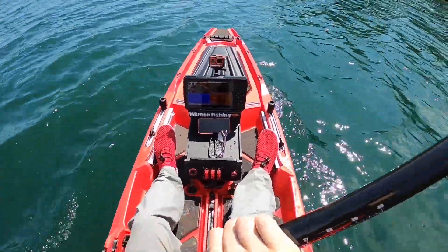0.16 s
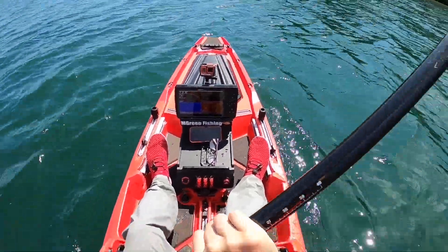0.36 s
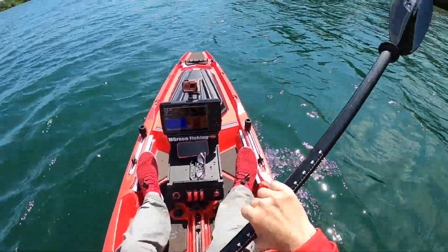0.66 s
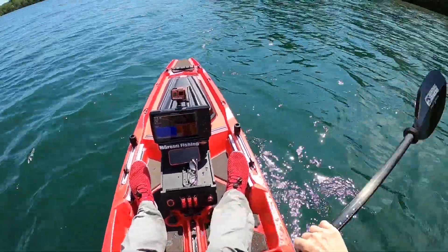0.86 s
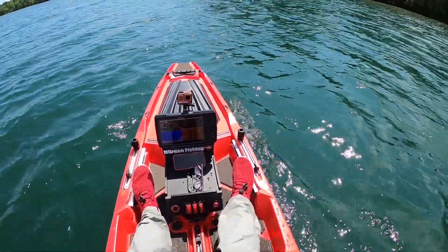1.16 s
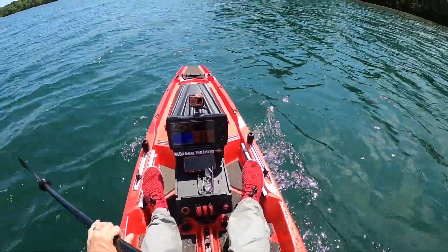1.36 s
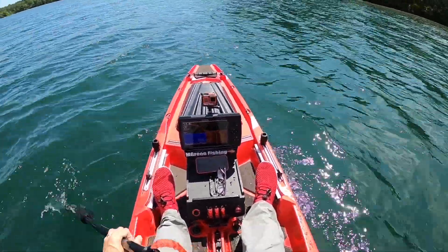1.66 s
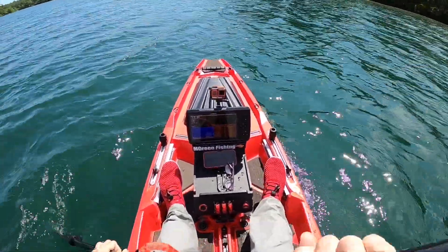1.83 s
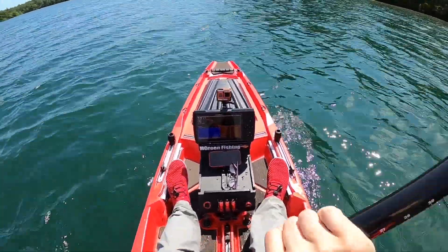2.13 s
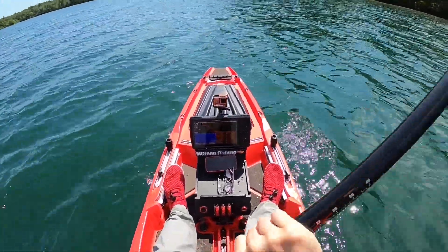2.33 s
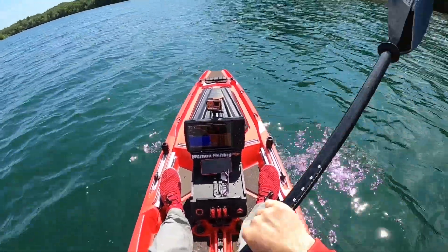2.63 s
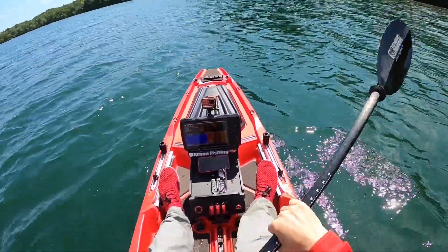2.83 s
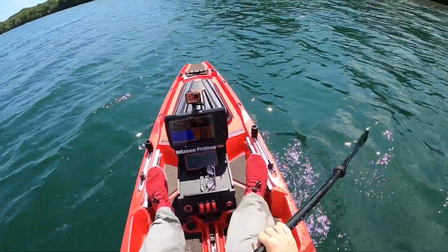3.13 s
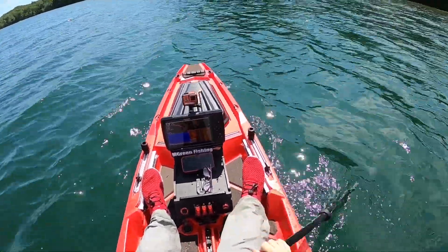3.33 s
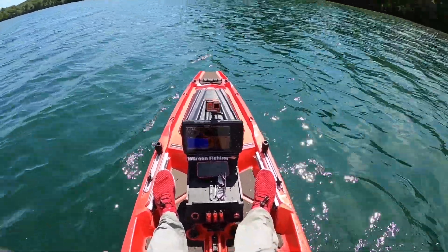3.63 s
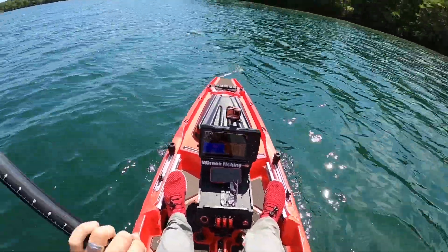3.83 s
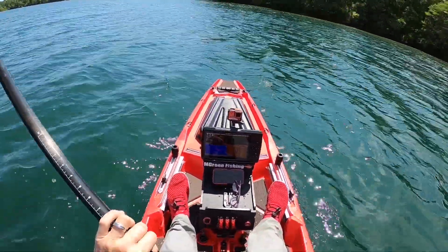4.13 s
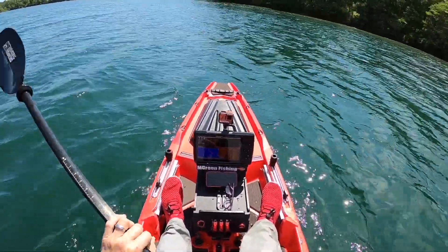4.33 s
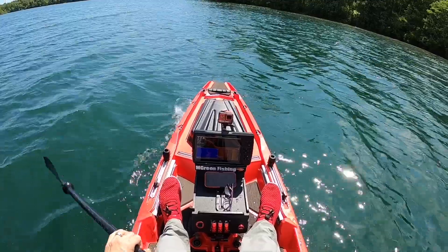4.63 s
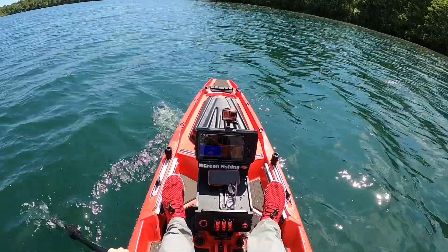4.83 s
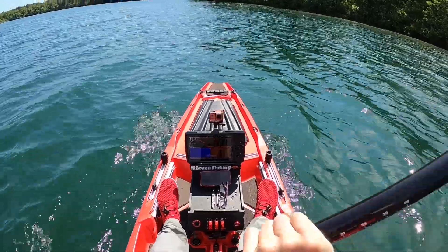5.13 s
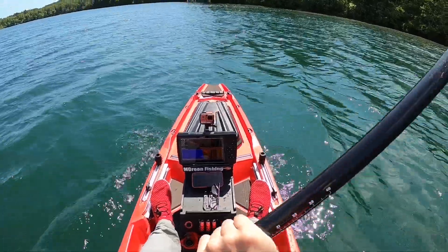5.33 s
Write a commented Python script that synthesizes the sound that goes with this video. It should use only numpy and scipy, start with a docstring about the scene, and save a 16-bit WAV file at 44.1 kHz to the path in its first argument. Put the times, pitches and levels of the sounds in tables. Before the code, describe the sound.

Close, single-channel sound of kayak paddling: soft hissing, bubbly water and bright drips from the blade under low wind buffeting. A faint rising whistle appears early and again near four seconds. Dripping is dense in the middle, a sharp plink comes at 3.3 seconds, wind thumps soon after, and a calmer gap leads to fresh splashing and a final gust.

```python
"""A kayak glides over a lake: filtered noise makes the wind that buffets the microphone on the paddler's head,
and noise with tiny bubble tones makes the water that fizzes along the hull and swells at each stroke.
Drops tick on water and deck from the start, as ringing pings; rising tones make bubbles that plop.
At 0.6 s a thin, faint sine whistles upward; from 1.6 to 2.8 s drops crowd in; near 3.6 s the wind thumps.
The whistle returns at 3.9 s, then from 4.8 s drops and splashes pick up and the wind rumbles louder to the end."""
import sys
import numpy as np
from scipy import signal
from scipy.fft import rfft, irfft, next_fast_len
from scipy.io import wavfile
from scipy.ndimage import uniform_filter1d

SR = 44100
rng = np.random.default_rng(int(sys.argv[2]) if len(sys.argv) > 2 else 0)


def file_out(sig):
    """Save sig as 16-bit WAV at sys.argv[1]."""
    # one column per channel
    cols = np.atleast_2d(sig).T
    # limit, then scale
    lim = np.clip(cols, -1, 1)
    pcm = np.round(lim * 32767).astype(np.int16)
    wavfile.write(sys.argv[1], SR, pcm)


N = 241528  # length in samples, about 5.5 s


def gain_of(db):
    """Turns decibels into a plain multiplier."""
    return 10 ** (np.asarray(db) / 20)


def evened(x):
    """Scales a signal so its average strength (rms) is 1."""
    return x / np.sqrt(np.mean(x ** 2) + 1e-20)


def smoothed(x, *widths):
    """Runs one moving average after another along the samples."""
    for width in widths:
        x = uniform_filter1d(x, width)
    return x


def read(points, hz):
    """Reads a level curve at any pitch, with pitch spaced by ratio as we hear it."""
    point_hz, level_db = np.transpose(points)
    return np.interp(np.log(hz + 1), np.log(point_hz + 1), level_db)


def curves(rows):
    """Joins each table column into a curve with one value per sample."""
    start_s, *columns = np.transpose(rows)
    return [np.interp(np.arange(N) / SR, start_s, column) for column in columns]


def add(mix, start_s, sound):
    """Adds a sound into the mix at its start time."""
    part = mix[max(round(start_s * SR), 0):][:len(sound)]
    part += sound[:len(part)]


def colour(x, points):
    """Shapes a sound's balance of low and high pitches, then sets its rms to 1."""
    size = next_fast_len(len(x))
    level_db = read(points, np.fft.rfftfreq(size, 1 / SR))
    shaped = irfft(rfft(x, size) * gain_of(level_db), size)
    return evened(shaped[:len(x)])


def band(x, lo_hz, hi_hz):
    """Keeps mainly the pitches between two limits."""
    return signal.sosfilt(signal.butter(3, [lo_hz, hi_hz], "band", fs=SR, output="sos"), x)


def chance(rate_hz):
    """Makes a random curve that wanders no faster than about rate_hz, with rms 1."""
    low_pass = signal.butter(2, rate_hz, fs=SR, output="sos")
    return evened(signal.sosfilt(low_pass, rng.standard_normal(N)))


def bursts(rows, edge_s, close_s, sag_db):
    """Makes a loudness curve that opens quickly at each row, drifts by sag_db and closes."""
    out = np.zeros(N)
    for start_s, level_db, length_s in rows:
        t = np.arange(0, abs(length_s) + edge_s + close_s / 2, 1 / SR)
        end_s = t[-1]
        gate = np.clip(np.minimum(t / edge_s, (end_s - t) / close_s), 0, 1)
        add(out, start_s, gain_of(level_db - sag_db * t / end_s) * gate)
    return out


# How strong each pitch is in the wind's deep rumble: pitch_hz [Hz], level_db [dB per Hz]
RUMBLE_COLOUR = [(12, -8), (25, -1.5), (60, 0), (130, -2), (240, -10.5), (400, -23.5), (800, -42.5),
                 (2000, -104)]
# How strong each pitch is in the wind's faster flutter: pitch_hz [Hz], level_db [dB per Hz]
FLUTTER_COLOUR = [(90, -10), (190, 4.5), (400, -2), (600, -10), (1000, -25), (1800, -75.5), (4000, -86)]
# Sudden puffs straight into the microphone, before overload:
# start_s [s], level_db [dB rms at the start], length_s [s]
PUFF_ROWS = [(.245, -41, .012), (.303, -35, 0.017), (.515, -27.5, 0.023), (.744, -26, 0.013),
             (.863, -29, 0.037), (.906, -28, 0.016), (2.474, -28, 0.014), (2.681, -27, 0.025),
             (2.942, -31, 0.014), (3.081, -42, 0.0096), (3.177, -15, 0.0053), (3.583, -21, 0.027),
             (3.612, -13, 0.0081), (3.672, -41, 0.015), (3.705, -31, 0.016), (5.362, -24.5, 0.015)]
# Wind on the microphone, before overload: start_s [s], rumble_db [dB], flutter_db [dB]
WIND_CURVE = [(0.0, -28, -31), (0.15, -20, -31), (0.21, -26, -41.5), (0.29, -22.5, -25.5),
              (0.69, -25.5, -34), (0.96, -23.5, -26), (1.4, -23.5, -34.5), (1.45, -22.5, -33),
              (1.91, -32, -40), (2.04, -26, -38), (2.12, -32.5, -38.5), (2.71, -23, -25.5),
              (2.97, -23, -31), (3.29, -20.5, -25.5), (3.45, -20, -27.5), (3.57, -15, -26.5),
              (3.6, -17, -24.5), (3.69, -17, -26), (3.74, -16, -31), (3.77, -20.5, -40.5),
              (4.44, -31.5, -54), (4.53, -26.5, -46), (4.62, -31, -34.5), (4.68, -26, -49),
              (4.77, -22, -34.5), (4.96, -30, -37.5), (5.26, -21.5, -40.5), (5.29, -26.5, -42),
              (5.48, -14, -21.5)]


def wind():
    """Large eddies rumble, small ones flutter in lumps, and puffs hit the microphone directly."""
    rumble_db, flutter_db = curves(WIND_CURVE)
    rumble = colour(rng.standard_normal(N), RUMBLE_COLOUR) * gain_of(0.52 * chance(rate_hz=4.2))
    lumps = gain_of(1.83 * chance(rate_hz=49.0))
    flutter = colour(rng.standard_normal(N) * lumps, FLUTTER_COLOUR)
    air = rng.standard_normal(N)
    puff_noise = evened(band(air, 93, 510) + gain_of(-15.5) * band(air, 830, 1104))
    puffs = puff_noise * bursts(PUFF_ROWS, edge_s=0.0019, close_s=0.0059, sag_db=2.0)
    gusts = puffs + gain_of(rumble_db) * evened(rumble) + gain_of(flutter_db) * evened(flutter)
    overload = 0.5  # pressure at which the microphone capsule flattens the gusts
    return overload * np.tanh(gusts / overload)


# Thin whistles: start_s [s], level_db [dB peak, before fade and flutter], length_s [s]
WHISTLE_ROWS = [(.612, -45, .15), (3.925, -51, .15)]


def whistle(level_db, length_s):
    """An unsteady, broken sine that climbs quickly, levels off and fades."""
    start_hz, top_hz, climb_s, fade_db_per_s = 3550, 4400, 0.055, 75
    t = np.arange(0, length_s, 1 / SR)
    pitch_hz = top_hz - (top_hz - start_hz) * np.exp(-t / climb_s)
    wobble, flutter = smoothed(rng.standard_normal((2, SR // 4)), 150, 40)[:, :len(t)]
    turns = np.cumsum(pitch_hz * (1 + 0.02 * evened(wobble))) / SR
    loudness = gain_of(level_db - fade_db_per_s * t + 5.3 * evened(flutter))
    return loudness * np.sin(2 * np.pi * turns) * signal.windows.tukey(len(t), 0.4)


def fizz(per_s, spread_db, cycles, lo_hz, hi_hz, climb, count):
    """Random bubbles: short rising tones of many pitches, a few of them large."""
    happens = rng.random(N) < per_s / SR
    size = gain_of(spread_db * np.minimum(rng.exponential(1, N), 4)) * happens
    kind = rng.integers(0, count, N)
    out = np.zeros(N)
    for k, hz in enumerate(np.geomspace(lo_hz, hi_hz, count)):
        turns = np.arange(int(4 * cycles * SR / hz)) * hz / SR
        tone = np.sin(2 * np.pi * turns * (1 + climb * turns))
        grain = tone * np.exp(-turns / cycles) * (1 - np.exp(-turns))
        # equal energy per hertz, so that the microphone alone sets the colour
        grain = grain * np.sqrt(hz) / np.linalg.norm(grain)
        out += signal.oaconvolve(size * (kind == k), grain)[:N]
    return evened(out)


# Water as the microphone colours it: pitch_hz [Hz], level_db [dB per Hz]
WATER_COLOUR = [(250, -34), (600, -2), (1000, -3), (1800, -6.5), (2300, -7), (3200, -5.5), (4400, -11),
                (5800, -16), (7100, -24), (8900, -23.5), (11000, -35), (12500, -49), (15000, -66)]
# Sheets of water thrown by the blade: start_s [s], level_db [dB rms at the start], length_s [s]
SPLASH_ROWS = [(.05, -56, 0.1), (.83, -42, 0.034), (1.674, -39, 0.034), (1.683, -26.5, 0.0022),
               (2.155, -41, 0.12), (3.378, -48, 0.037), (4.787, -41.5, 0.12), (4.842, -41, 0.15),
               (5.335, -46, 0.042)]


def splashes():
    """Sheets of water thrown by the blade: flickering noise crackling with tiny bubble tones."""
    crackle = fizz(per_s=1800, spread_db=3.5, cycles=4.5, lo_hz=800, hi_hz=14400, climb=0.0075, count=24)
    sheet = colour(rng.standard_normal(N) + 1.6 * crackle, WATER_COLOUR)
    # a negative sag makes each splash grow
    loudness = bursts(SPLASH_ROWS, edge_s=0.00019, close_s=0.0088, sag_db=-3.5)
    return sheet * loudness * gain_of(2.4 * chance(rate_hz=54))


# Water along hull and blade: start_s [s], fizz_db [dB], low gurgle_db [dB], treble spray_db [dB]
STIR_CURVE = [(0.0, -47.5, -48, -53.5), (0.1, -45, -40, -60), (0.22, -51.5, -45, -64.5),
              (0.4, -49, -46.5, -67), (0.58, -50.5, -44.5, -64.5), (0.78, -47, -44, -64.5),
              (1.02, -49, -50, -69), (1.65, -52.5, -58, -63), (2.07, -48.5, -50, -68.5),
              (2.32, -49, -46, -57.5), (2.64, -47.5, -42.5, -66), (2.94, -51.5, -48, -67),
              (3.28, -48.5, -47.5, -59), (3.48, -53.5, -56, -66), (3.75, -53, -59, -73.5),
              (4.24, -55.5, -52, -65.5), (4.44, -49.5, -52.5, -70.5), (4.76, -47.5, -45.5, -60),
              (4.9, -43.5, -64, -51), (5.0, -50, -44.5, -58), (5.14, -51, -46, -67.5),
              (5.48, -52.5, -46.5, -62)]


def water():
    """A patchy hiss with bubbly crackle and gurgle over it, set to separate low, middle and treble levels."""
    fizz_db, gurgle_db, spray_db = curves(STIR_CURVE)
    # small patches of time and pitch come out louder or softer
    _, _, grid = signal.stft(rng.standard_normal(N), SR, nperseg=256)
    patches = uniform_filter1d(rng.standard_normal(grid.shape), 6, axis=0)
    patches = evened(uniform_filter1d(patches, 10, axis=1))
    hiss = signal.istft(grid * gain_of(2.4 * patches), SR, nperseg=256)[1][:N]
    flicker = gain_of(0.31 * chance(rate_hz=24.0))  # laps that land across all pitches
    crackle = fizz(per_s=1600, spread_db=2.5, cycles=6.6, lo_hz=1500, hi_hz=13060, climb=0.0048, count=22)
    gurgle = fizz(per_s=180, spread_db=2.0, cycles=3.9, lo_hz=472, hi_hz=2383, climb=0.009, count=14)
    # the harder the water is stirred, the more it bubbles
    churn = np.clip((fizz_db + 56.5) / 11, 0.1, 1.6)
    mix = evened(hiss) * flicker + churn * (crackle + 0.52 * gurgle)
    mix = colour(mix / np.sqrt(1 + churn ** 2), WATER_COLOUR)
    low = signal.sosfiltfilt(signal.butter(2, 1800, fs=SR, output="sos"), mix)
    spray = signal.sosfiltfilt(signal.butter(2, 5500, "high", fs=SR, output="sos"), mix)
    middle = mix - low - spray
    # each part is scaled by the strength of the whole in its own pitch range
    out = gain_of(gurgle_db) * low / np.std(band(mix, 900, 1600))
    out += gain_of(fizz_db) * middle / np.std(band(mix, 1860, 5200))
    out += gain_of(spray_db) * spray / np.std(band(mix, 5800, 11000))
    return out + splashes()


# Bubbles: start_s [s], level_db [dB peak, before flutter], start pitch_hz [Hz],
# rise [octaves, negative falls], length_s [s]
BUBBLE_ROWS = [(0.085, -44, 790, 0.81, 0.029), (0.106, -32, 780, 1, 0.027), (.6, -37, 627, 1.6, 0.039),
               (0.635, -29.5, 925, .45, 0.024), (.645, -31, 645, 0.65, 0.032),
               (0.857, -35, 1010, 0.019, 0.037), (2.217, -23, 683, 1.3, 0.0088),
               (2.226, -31, 840, 0.66, 0.014), (2.295, -33.5, 698, 0.017, 0.031),
               (4.182, -44, 880, 1.15, 0.013), (2.581, -28, 732, 1.04, 0.027),
               (2.799, -33, 935, 0.81, 0.015), (3.977, -43, 1500, -0.21, .022),
               (3.986, -39.5, 542, 0.84, 0.028), (4.613, -33, 734, 0.12, 0.022),
               (4.851, -27, 840, 0.09, 0.0091), (4.865, -30, 1500, -0.32, 0.02),
               (4.9, -30, 1676, 0.12, 0.026), (5.033, -37.5, 1700, 0.19, 0.021),
               (5.109, -29.5, 943, 1.1, 0.026), (5.265, -35, 1390, -0.19, 0.034),
               (4.525, -42, 980, -0.31, 0.027)]


def bubble(level_db, pitch_hz, rise_octaves, length_s):
    """The pitch usually climbs, unsteadily, as the bubble nears the choppy surface."""
    samples = abs(length_s) * SR + 8
    u = np.arange(int(samples)) / samples  # runs from 0 to 1 over the bubble
    shake, flutter = smoothed(rng.standard_normal((2, len(u))), 90, 40)
    octaves = rise_octaves * u + 0.065 * evened(shake - shake.mean())
    turns = np.cumsum(pitch_hz * 2 ** octaves) / SR
    loudness = gain_of(level_db + 2 * evened(flutter - flutter.mean()))
    return loudness * np.sin(2 * np.pi * turns) * np.sin(np.pi * u ** 0.45)


def drips(count):
    """Picks small random drops, crowding where the water is stirred hardest."""
    fizz_db = curves(STIR_CURVE)[0]
    share = np.cumsum(gain_of(2.2 * fizz_db))  # 2.2 sets how strongly they crowd
    when, size, pitch, ring, crack = rng.random((count, 5)).T
    at = np.minimum(np.searchsorted(share / share[-1], when), N - 1)
    level_db = fizz_db[at] + 9 + 3 * size
    pitch_hz = 999 * 2 ** (2.08 * pitch)  # from 999 Hz up to 2.08 octaves above
    ring_s = 0.013 * (0.5 + ring)
    crack_db = -28 + 16 * (crack - 0.5)
    return zip(at / SR, level_db, pitch_hz, ring_s, crack_db)


# How strong each pitch is in a drop's crack: pitch_hz [Hz], level_db [dB per Hz]
CRACK_COLOUR = [(1500, -4), (3500, 0.5), (5500, -6.5), (7400, -25.5), (9300, -14.5), (11500, -36),
                (15000, -74)]
# The loudest drops and slaps: start_s [s], level_db [dB, roughly the peak], ring pitch_hz [Hz],
# ring_s [s to fade by 60 dB, at least 0.004], crack_db [dB, crack against ring before the final blend]
DROP_ROWS = [(.0712, -32, 9000, 0.011, -2), (.138, -41, 8900, 0.0074, -3), (.4738, -42, 9000, .01, -14),
             (.135, -30, 3300, .012, -33), (.668, -31, 2000, .03, -40), (.713, -30, 1240, 0.023, -38),
             (.0778, -22.5, 4200, .015, -25), (.0993, -23.5, 2520, 0.016, -30),
             (.1283, -22.5, 2000, 0.013, -35), (.178, -34, 5400, 0.016, -22),
             (.3107, -23.5, 3700, 0.014, -29), (.3256, -25.5, 1310, 0.011, -38),
             (.4421, -17.5, 1560, 0.0044, -37), (.6473, -27, 1230, 0.05, -22), (.79, -31, 3300, 0.034, -27),
             (1.0731, -30, 1920, 0.037, -38), (1.1733, -21, 2930, 0.01, -20),
             (1.644, -30.5, 2280, 0.04, -14), (1.6965, -23.5, 1640, 0.015, -13),
             (1.7035, -29, 4300, 0.028, -12), (1.7995, -20.5, 2140, 0.041, -21),
             (1.839, -33, 4240, .013, -13), (1.8452, -18.5, 2020, 0.018, -14),
             (1.887, -31.5, 2970, 0.013, -8), (1.966, -30, 4230, .019, -17),
             (1.9757, -29.5, 2280, 0.046, -13), (2.0188, -26, 4100, 0.012, -23),
             (2.055, -27.5, 3530, 0.007, -15), (2.1263, -31, 4500, .016, -25),
             (2.161, -25, 4200, 0.0071, -26), (2.219, -27, 950, 0.025, -21),
             (2.2281, -22, 1110, 0.018, -23), (2.2364, -22, 1500, 0.03, -15),
             (2.253, -31, 2800, 0.023, -27), (2.438, -26, 1220, .012, -32), (2.572, -23, 890, .012, -40),
             (2.593, -29, 3200, .015, -37), (2.564, -18.5, 2100, 0.015, -32),
             (2.675, -34, 2200, 0.026, -30), (2.2741, -31, 5280, .0054, -25),
             (2.2961, -31, 5440, 0.014, -21), (2.325, -32, 3800, 0.0052, -8.5),
             (2.396, -22.5, 1200, 0.014, -43), (2.4693, -21, 3120, 0.0069, -16),
             (2.572, -18.5, 2030, 0.038, -27), (2.6541, -12.5, 1990, 0.028, -51),
             (2.7128, -17.5, 1830, 0.009, -29), (2.724, -20, 2010, 0.01, -36),
             (2.735, -22, 2120, 0.024, -15), (2.754, -25, 2310, 0.018, -22),
             (2.8039, -25, 1550, 0.089, -23), (2.8285, -24, 1780, 0.011, -41),
             (3.105, -36, 4580, 0.015, -4), (3.1555, -24, 2210, 0.024, -31), (3.203, -30, 1540, 0.025, -11),
             (3.245, -29.5, 2100, 0.037, -18), (3.3256, -10.5, 3470, 0.035, -15),
             (3.36, -38, 3320, 0.35, -18), (3.328, -25.5, 1230, 0.039, -31), (3.258, -48, 8500, .008, -8),
             (3.3497, -26, 1780, 0.027, -15), (4.058, -31, 5230, 0.011, -13),
             (4.065, -36.5, 2820, 0.036, -27), (4.287, -35.5, 2180, 0.096, -37),
             (4.4814, -28.5, 3560, 0.064, -17), (4.8161, -8.5, 1790, 0.0043, -41),
             (4.699, -39, 8600, 0.017, -1), (4.7745, -36, 3400, .01, -27), (4.863, -18, 4380, 0.021, -20),
             (4.894, -19, 2510, .01, -10), (4.9083, -20.5, 2810, 0.017, -13),
             (4.9822, -29, 1820, 0.016, -18), (5.093, -30, 3530, 0.01, -25), (5.045, -26, 2380, 0.016, -16),
             (5.083, -40, 8500, 0.016, 3), (5.273, -13.5, 5000, 0.0091, -16.5),
             (5.358, -18, 7840, 0.0074, -6.5), (5.3835, -34.5, 5900, 0.017, -5),
             (5.4512, -25.5, 2400, 0.04, -20.5)]


def drop(level_db, pitch_hz, ring_s, crack_db):
    """A few swelling cycles, a ragged ring behind them and a thin crack on top."""
    t = np.arange(2600) / SR
    swell = t * pitch_hz / 0.91
    plink = np.sin(2 * np.pi * pitch_hz * t) * swell * np.exp(1 - swell)
    fade = gain_of(-60 * t / max(ring_s, 0.004)) * (1 - np.exp(-t / 0.00067))
    span = int(SR / pitch_hz) + 8  # about one cycle: the ring wavers from cycle to cycle
    wander, shake = smoothed(rng.standard_normal((2, len(t))), span, span, span)
    turns = pitch_hz * np.cumsum(1 + 0.07 * evened(wander)) / SR
    ring = np.sin(2 * np.pi * turns) * gain_of(3 * evened(shake))
    crack = band(colour(rng.standard_normal(len(t)), CRACK_COLOUR), 1800, 16000) * fade
    crack = crack / np.abs(band(crack, 5560, 8800)).max()
    return gain_of(level_db) * (0.55 * plink + 0.61 * ring * fade + 0.46 * gain_of(crack_db) * crack)


def scene():
    """Layers wind, whistles, water, bubbles and drops in one channel."""
    mix = wind()
    for start_s, *settings in WHISTLE_ROWS:
        add(mix, start_s, whistle(*settings))
    mix += water()
    for start_s, *settings in BUBBLE_ROWS:
        add(mix, start_s, bubble(*settings))
    for start_s, *settings in [*DROP_ROWS, *drips(count=90)]:
        add(mix, start_s, drop(*settings))
    return mix[None]


def record(dry):
    """Removes the pitches above about 15100 Hz."""
    low_pass = signal.firwin(511, 15100, window=("kaiser", 9), fs=SR)
    return signal.oaconvolve(dry, low_pass[None], "same")


dry = scene()
out = record(dry)
file_out(out)
```